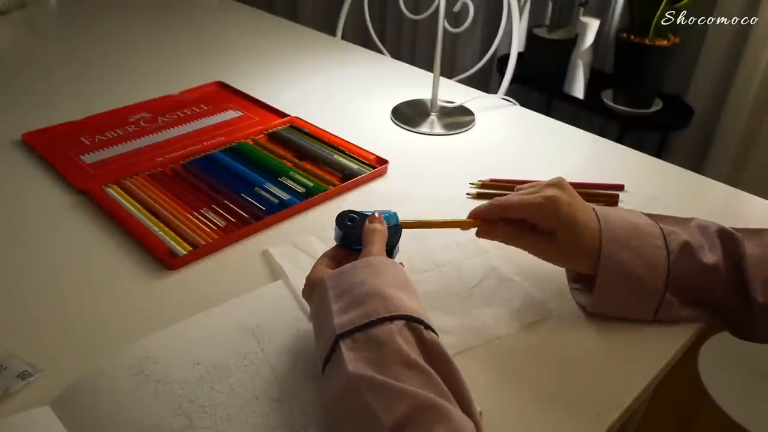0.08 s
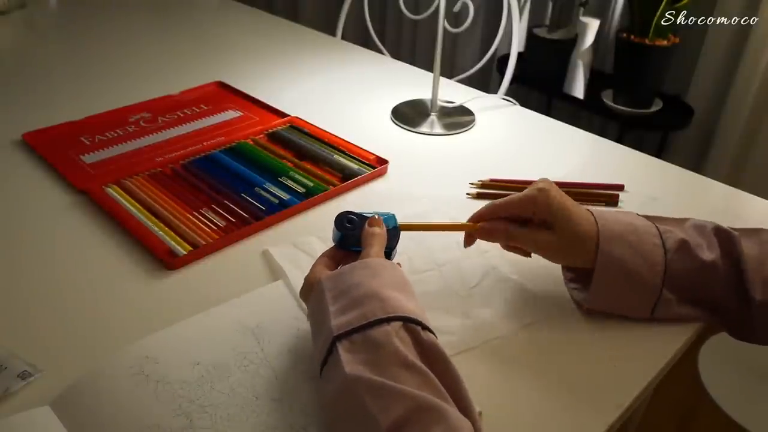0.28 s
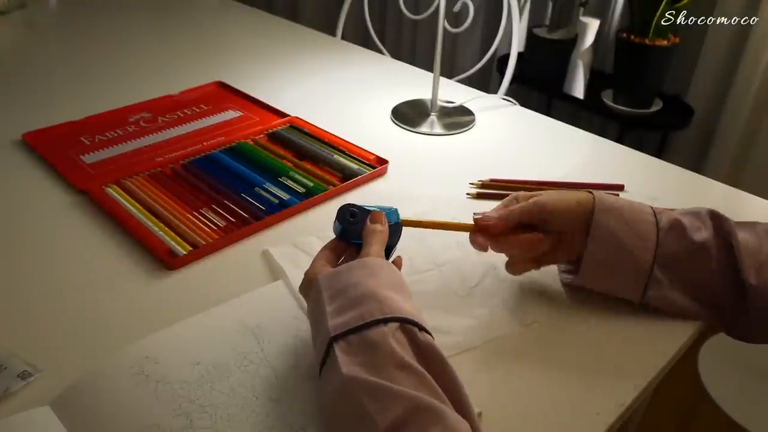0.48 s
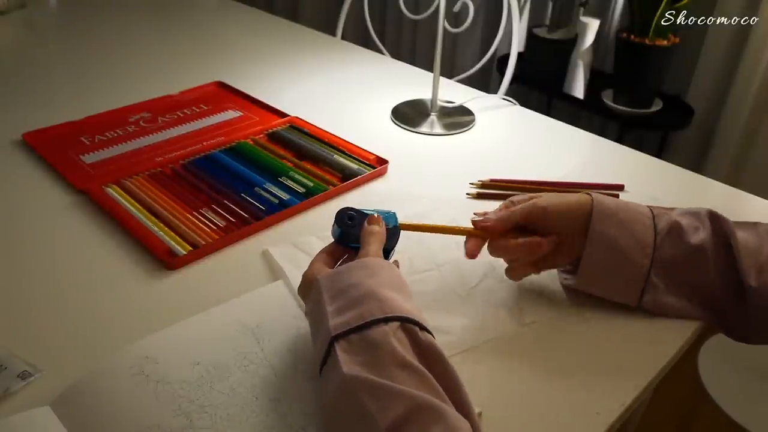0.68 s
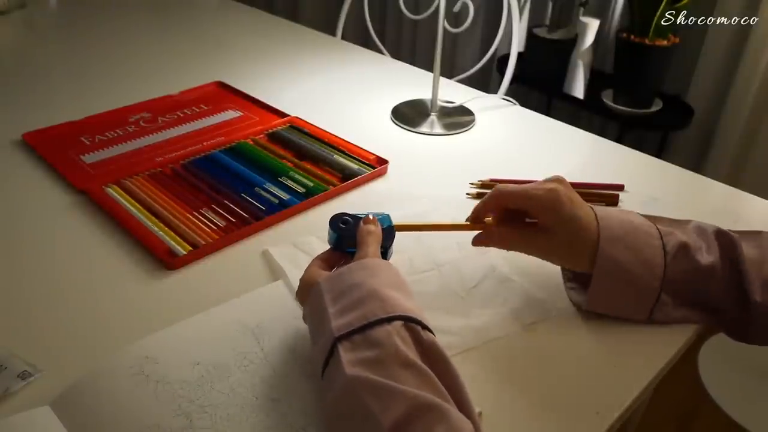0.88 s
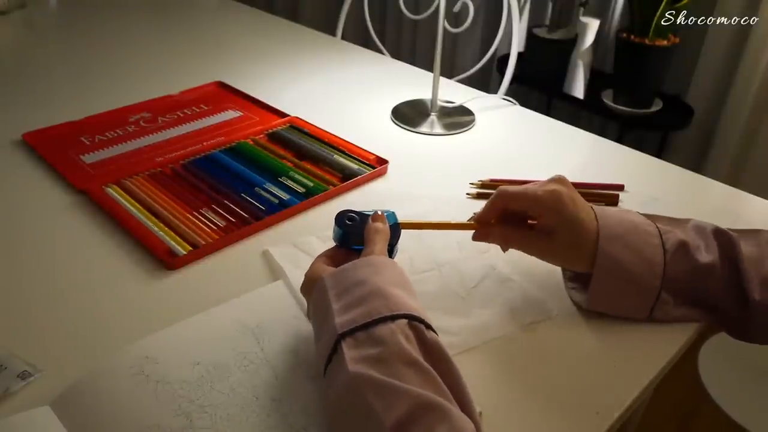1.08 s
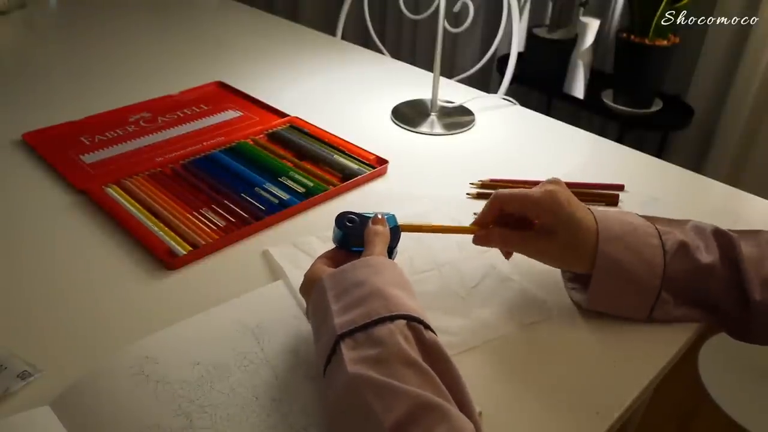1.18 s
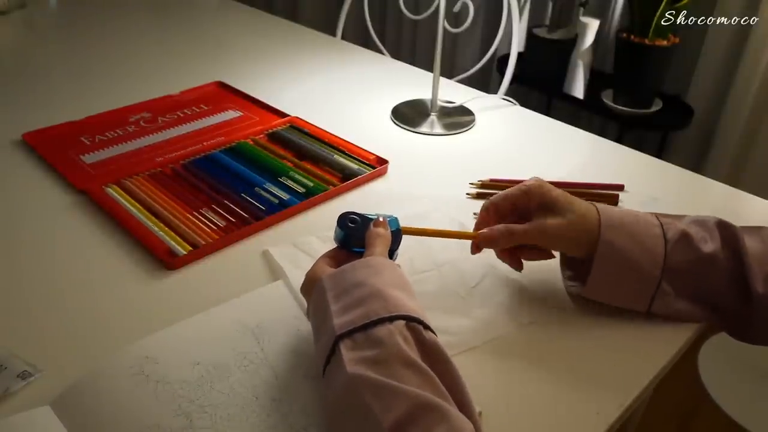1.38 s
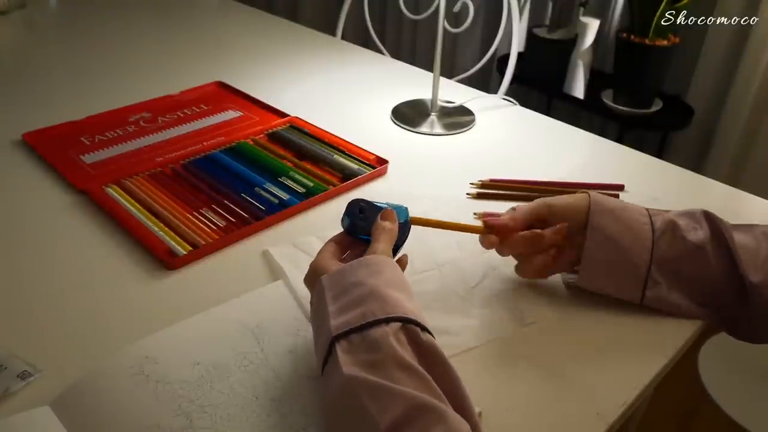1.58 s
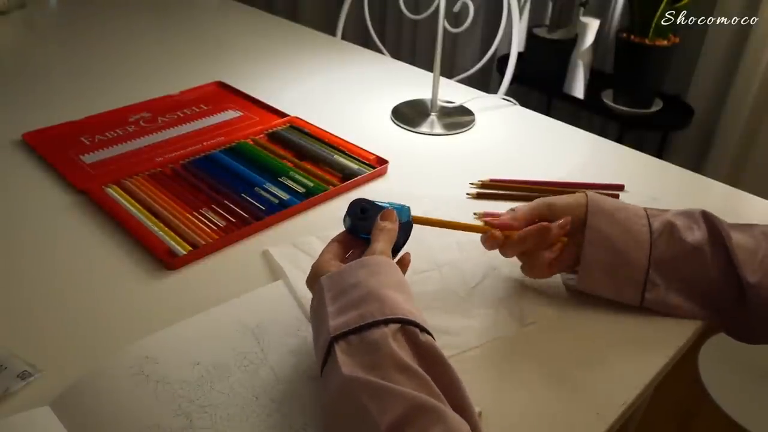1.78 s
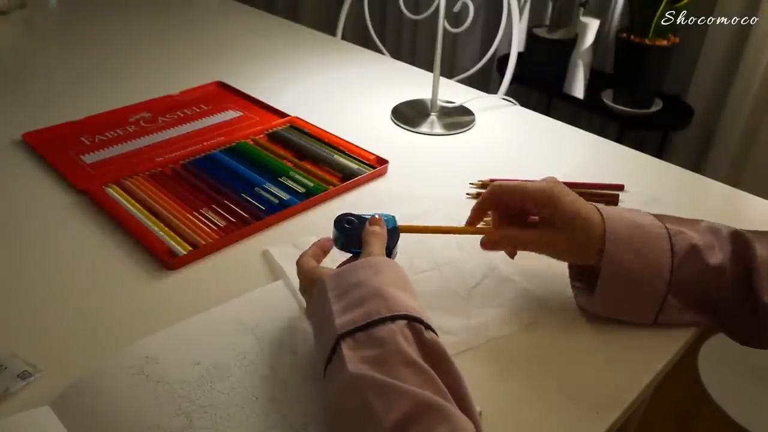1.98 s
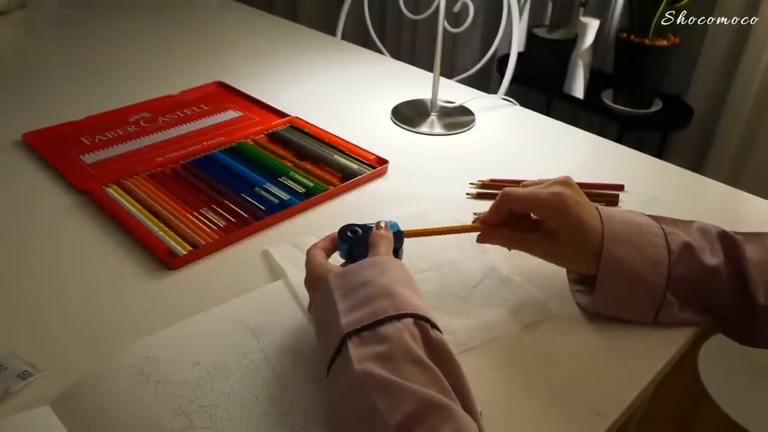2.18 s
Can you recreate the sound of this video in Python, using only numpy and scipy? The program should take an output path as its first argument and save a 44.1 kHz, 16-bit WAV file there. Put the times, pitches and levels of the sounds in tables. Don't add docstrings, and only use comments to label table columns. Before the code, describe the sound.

Close stereo pickup of pencil sharpening indoors: a sharp bite and gritty half-second scrape, a gap with dull low motor ticks, a second scrape that starts lightly and deepens, then a barely audible finger rub on plastic.

```python
import sys
import numpy as np
from scipy import signal
from scipy.fft import rfft, irfft, next_fast_len
from scipy.io import wavfile

SR = 44100
rng = np.random.default_rng(int(sys.argv[2]) if len(sys.argv) > 2 else 0)


def waveform_to_disk(signal):
    frames = np.transpose(np.atleast_2d(signal))
    scaled = np.clip(frames, -1, 1) * 32767
    samples = np.round(scaled).astype(np.int16)
    wavfile.write(sys.argv[1], SR, samples)


def undo_db(level):
    steps = np.asarray(level, float) / 20
    return 10 ** steps


N = 97020


def rms_one(x):
    return x / np.sqrt(np.mean(x ** 2) + 1e-20)


def at_hz(points, hz):
    point_hz, point_db = np.transpose(points)
    return np.interp(np.log(hz), np.log(point_hz), point_db, left=-60, right=-60)


def drift(rate):
    r = np.exp(-16 * np.pi * rate / SR)
    noise = rng.standard_normal(N // 8 + 4002)
    slow = signal.lfilter([1], [1, -2 * r, r * r], noise)[4000:]
    return np.interp(np.arange(N) / 8, np.arange(len(slow)), rms_one(slow))


def resonance(x, hz, width_hz):
    r = np.exp(-np.pi * width_hz / SR)
    ringing = [1, -2 * r * np.cos(2 * np.pi * hz / SR), r * r]
    return signal.lfilter(np.array([1, 0, -1]) * (1 - r * r) / 2, ringing, x)


def twice(x, hz, width_hz):
    wider_hz = 1.55 * width_hz
    return resonance(resonance(x, hz, wider_hz), hz, wider_hz)


def gliding(x, hz, width_hz):
    turn = np.exp(2j * np.pi * np.cumsum(hz) / SR)
    r = np.exp(-1.55 * np.pi * width_hz / SR)
    return 2 * np.real(turn * signal.lfilter([(1 - r) ** 2], [1, -2 * r, r * r], x / turn))


# (f/Hz, likeness/0-1)
LIKENESS = [(60, 0.99), (180, 0.96), (550, 0.98), (1650, 0.8), (4970, 0.5), (15000, 0.84)]


def banded_noise(spectrum, patchy_db, count):
    out = 0
    edges = 18 * 2 ** np.arange(0, 10, 1 / count)
    white = rng.standard_normal((2, 2, N + 8000))
    likeness_hz, likeness = np.transpose(LIKENESS)
    for k, (low, high) in enumerate(zip(edges, edges[1:])):
        hz = np.sqrt(low * high)
        if spectrum[0][0] <= hz <= spectrum[-1][0]:
            band = signal.butter(2, [low, high], "band", fs=SR, output="sos")
            mid, side = signal.sosfilt(band, white[k % 2])[:, 8000:]
            alike = np.clip(np.interp(np.log(hz), np.log(likeness_hz), likeness), 0, 1)
            gain = undo_db(at_hz(spectrum, hz) + patchy_db * drift(6.9))
            out = out + gain * (np.sqrt(1 + alike) * mid + np.sqrt(1 - alike) * side * [[1], [-1]])
    return rms_one(out)


# (f/Hz, level/dB per Hz)
RUMBLE = [(12, -33), (20, 1.5), (53, 2.5), (113, -2), (409, -2.5), (526, -5.5), (742, -9.5), (1210, -7.5),
          (1500, -27.5), (1950, -15.5), (3300, -120)]
# (f/Hz, level/dB per Hz)
HISS = [(1400, -1), (2500, -11), (3600, 0.5), (5300, -10), (7000, -1), (10500, -6.5), (13500, -1.5),
        (17000, 0.5)]


def rumble_and_hiss():
    rumble = undo_db(-57) * banded_noise(RUMBLE, patchy_db=2.5, count=3)
    hiss = undo_db(-60.5) * banded_noise(HISS, patchy_db=1.5, count=6)
    return rumble + hiss


# (t/s, level/dB)
WHIR = [
    (0, 2),
    (.3, -9.5),
    (.75, 3),
    (1.25, 0),
    (1.8, 0.5),
    (2.2, -7.5),
]
# (f/Hz, width/Hz, level/dB rms)
CASING = [(44.5, 8.4, -67), (250, 65, -66), (406, 6.9, -64.5), (500.6, 13, -64.5), (642, 23, -73),
          (1203, 33, -76)]


def whir():
    white = rng.standard_normal(N + 8000)
    busy = undo_db(np.interp(np.arange(N) / SR, *np.transpose(WHIR)))
    return busy * sum(undo_db(db) * rms_one(resonance(white, hz, width_hz)[8000:]) for hz, width_hz, db in CASING)


# (t/s, pressure level/dB, depth of cut/0-1, shavings cup level/dB, blade f/Hz)
TWIST_ONE = [
    (.2255, -58, 0, -9, 7500),
    (0.232, -37.5, 0.06, -3, 7200),
    (.275, -47, 0.63, -3.5, 8000),
    (.43, -44, 0.9, 2, 6900),
    (.475, -40.5, 0.64, 4.5, 7850),
    (.53, -40, 0.78, 0, 6800),
    (0.584, -36, 0.92, -3, 7800),
    (.62, -42, 0.76, -4.5, 7460),
    (.76, -69, 0, 7.5, 7300),
]
TWIST_TWO = [
    (1.2, -72, 0.05, -2, 7900),
    (1.235, -57.5, .05, 0.5, 7800),
    (1.33, -55.5, 0.27, -1, 7840),
    (1.42, -47, 0.28, -1, 8040),
    (1.545, -43.5, 0.7, -7, 7500),
    (1.56, -43, 0.99, -11, 7900),
    (1.66, -42, 1, 2.5, 8000),
    (1.746, -42.5, 1, 10.5, 8160),
    (1.88, -68.5, 1, -10, 8260),
]


def grip(s):
    times, *columns = np.transpose(TWIST_ONE + TWIST_TWO)
    pressure_db, depth, cup_db, blade_hz = [np.interp(s, times, column) for column in columns]
    return pressure_db, np.clip(depth, 0, 1), cup_db, blade_hz


# (f/Hz, width/Hz, first twist light level/dB, deep level/dB, second twist light level/dB, deep level/dB)
HOUSING = [(930, 630, -10, -15, -12.5, -11), (1743, 132, -13, -1.5, -5.5, -6.5),
           (1980, 190, -20, -6.5, 0.5, -4.5), (2550, 970, -27, -10.5, -1, -21.5),
           (3490, 545, -1.5, -8, -11, -10), (4280, 430, -2.5, 0, -4, -5), (4930, 850, -4, -7.5, -8, -1),
           (5970, 1700, -7.5, -7.5, -11, -3.5), (6790, 810, -1, -3, -6.5, -1.5),
           (8280, 880, -4, -2.5, -28, 1), (9370, 1060, -10, -5, -8.5, -3), (11100, 1430, 0.5, -3.5, -3, 0),
           (13050, 1100, -1, -2.5, -1, -1.5), (14240, 2400, -2, -9, -12, -3)]


def housing_db(mode, s):
    hz, _, light_one, deep_one, light_two, deep_two = mode
    _, depth, cup_db, _ = grip(s)
    second = s > TWIST_TWO[0][0]
    light_db = np.where(second, light_two, light_one)
    deep_db = np.where(second, deep_two, deep_one)
    return light_db + depth * (deep_db - light_db) + cup_db * (3000 < hz < 4500)


# (t/s, peak level/dB, favoured
# f/Hz, breadth level/dB)
SNAPS = [(0.2118, -41, 7100, 0), (0.226, -13.5, 7600, -4), (0.2273, -24, 10800, -10),
         (0.2336, -28, 11890, -2), (0.2375, -21, 13610, 1), (0.249, -20.5, 7800, 8),
         (0.2822, -37, 7540, -2.5), (0.3006, -24, 7450, -8), (0.3217, -33, 7710, -8),
         (0.3262, -27, 7540, -3), (0.3406, -28, 7200, -1), (0.3556, -26.5, 7200, -2),
         (0.3575, -36, 11700, -21), (0.3639, -33, 7200, -10), (0.371, -36, 6840, 5), (0.3806, -32, 7410, 3),
         (0.3859, -27.5, 7300, -5), (0.3941, -28, 7450, -3), (0.4032, -30, 13000, 2),
         (0.4057, -29, 6870, -3), (0.423, -32, 6700, 0), (0.4303, -29.5, 6700, -2), (0.446, -30, 6980, -2),
         (0.4532, -33, 4200, -1), (0.4687, -27, 8130, -3), (0.4764, -27, 8100, -1), (0.479, -26, 8050, 3),
         (0.4945, -25, 7100, 3), (0.5044, -33, 4560, 4), (0.5106, -29, 4120, -10), (0.5171, -29, 4420, -4),
         (0.5314, -29, 7040, -1), (0.5405, -34, 8400, -4), (0.5426, -28, 7500, -8), (0.547, -24, 7240, -4),
         (0.5617, -23, 7860, -4), (0.565, -22, 7840, 2), (0.5762, -17.5, 7060, 4), (0.582, -27, 7240, 5),
         (0.5869, -34, 14250, 0), (0.6151, -48, 10600, 6), (0.632, -31, 8200, 3), (0.6453, -36, 8100, -1),
         (0.6886, -42, 3830, -2),
         (1.2373, -39, 7500, -6), (1.2512, -51, 7750, -9), (1.262, -42, 7920, -12),
               (1.271, -50, 8050, -7), (1.3042, -33.5, 7500, -3), (1.337, -37, 8740, 3),
               (1.3568, -39, 7300, -9), (1.4162, -42, 7880, 3), (1.432, -33.5, 12100, 2),
               (1.4484, -39, 11670, 3), (1.479, -33, 5300, -2), (1.4971, -30, 13100, 6),
               (1.5083, -31, 5250, -4), (1.5287, -28, 5350, -4), (1.5322, -28.5, 5270, -14),
               (1.5547, -19, 5430, -1), (1.5618, -25, 7500, -9), (1.5652, -20, 13400, 3.5),
               (1.574, -29, 6850, 0), (1.5762, -24, 6600, 4), (1.5946, -29, 11300, -1),
               (1.6047, -27, 11800, 2), (1.6143, -32, 5330, 0), (1.6178, -35, 11100, 2),
               (1.6298, -30, 13310, 1), (1.6339, -28, 12700, 5), (1.65, -29, 8550, 10),
               (1.6615, -43, 8350, -3), (1.6654, -32, 11400, 2), (1.6844, -39, 8050, 3),
               (1.695, -24.5, 7840, 7), (1.6994, -30, 10700, 3), (1.7068, -26.5, 11580, 0),
               (1.7198, -32, 11540, -13), (1.7247, -26.5, 7100, 1), (1.729, -24, 6100, 1),
               (1.7387, -40, 6160, -1), (1.7439, -39, 8600, -2), (1.7549, -28.5, 4670, 11),
               (1.7663, -32, 13350, -1), (1.7767, -29.5, 5760, 2), (1.7946, -45, 13300, -1),
               (1.8213, -41, 8530, -7), (2.117, -44, 7200, -1),
         (.2264, -24, 4600, -4),
]


def snaps():
    rise_s, t60_s, width_hz = 0.0007, 0.0065, 600
    out, t = np.zeros(N + 2048), np.arange(2048) / SR
    rows = SNAPS
    for (s, db, hz, broad_db), white in zip(rows, rng.standard_normal((len(rows), 2, 2048))):
        hard = 3 + (db > -21)
        burst = white * np.minimum(t / rise_s * hard ** 2, 1) * undo_db(-60 * t / t60_s)
        body = 0
        for k, mode in enumerate(HOUSING[1:]):
            body = body + undo_db(housing_db(mode, s)) * twice(burst[k % 2], mode[0], mode[1])
        snap = rms_one(twice(burst[0], hz, width_hz)) + undo_db(broad_db) * rms_one(body)
        out[int(s * SR):][:2048] += undo_db(db - 1) * snap / np.abs(snap).max()
    return out[:N]


def shaving():
    fibres_per_s, spread_db = 5500, 3.1
    t = np.arange(N) / SR
    pressure_db, depth, _, blade_hz = grip(t)
    first = (t > TWIST_ONE[0][0]) & (t < TWIST_ONE[-1][0])
    second = (t > TWIST_TWO[0][0]) & (t < TWIST_TWO[-1][0])
    sizes = undo_db(spread_db * np.minimum(rng.exponential(1, (3, N)), 5)) * rng.choice([-1, 1], (3, N))
    clicks = sizes * (rng.random((3, N)) < fibres_per_s / SR)
    chatter = undo_db(1.0 * drift(300))
    fibres = rms_one(clicks * chatter) * undo_db(pressure_db + 6.5) * (first | second)
    blade_db = 4 + depth * (-2.5 - 4)
    out = undo_db(blade_db) * gliding(fibres[2], blade_hz, 960)
    for k, mode in enumerate(HOUSING):
        wander_db = 1.5 * drift(25)
        out += undo_db(housing_db(mode, t) + wander_db) * twice(fibres[k % 2], mode[0], mode[1])
    return out


# (t/s, peak level/dB, f/Hz)
TICKS = [(0.51, -35.5, 400), (0.511, -32, 550), (0.768, -38.5, 524), (0.819, -45, 430), (0.902, -37, 555),
         (0.937, -38, 428), (1.001, -42.5, 520), (1.035, -36.5, 490), (1.1, -34, 520), (1.153, -55, 520),
         (1.185, -41, 540), (1.269, -34, 490), (1.304, -40.5, 427), (1.805, -37.5, 406),
         (1.835, -40.5, 410), (1.87, -37, 537), (2.01, -40.5, 450)]


def ticks():
    upper_hz, upper_db, rise_s, t60_s = 1126, -14, 0.00068, 0.025
    out, t = np.zeros(N + 4096), np.arange(4096) / SR
    fall = (1 - np.exp(-t / rise_s)) * undo_db(-60 * t / t60_s)
    for s, db, hz in TICKS:
        tick = np.sin(2 * np.pi * hz * t) + undo_db(upper_db) * np.sin(2 * np.pi * upper_hz * t)
        out[int(s * SR):][:4096] += undo_db(db - 6.5) * tick * fall / fall.max()
    return out[:N]


def fingers():
    start_s, level_db, hz, width_hz = 1.8, -70.5, 5260, 2000
    rub = rms_one(twice(rng.standard_normal(N), hz, width_hz))
    return undo_db(level_db) * rub * np.clip(10 * (np.arange(N) / SR - start_s), 0, 1)


def room(x):
    t60_s, wall_cut_hz, share = 0.22, 29000, 0.53
    size = next_fast_len(N + SR)
    hz = np.arange(size // 2 + 1) * SR / size
    dull = 1 / (1 + 1j * hz / wall_cut_hz)
    tails = np.zeros((2, len(hz)), complex)
    for k, lag in enumerate(rng.uniform(0.006, 0.03, 16)):
        loop = undo_db(-60 * lag / t60_s) * dull ** (lag / 0.018) * np.exp(-2j * np.pi * hz * lag)
        tails[k % 2] += loop / (1 - loop) * (-1) ** (k // 2)
    thin = (hz / (hz + 120)) ** 2
    mid, side = irfft(tails * thin * rfft(x, size), size)[:, :N] / np.sqrt(8)
    return np.sqrt(1 + share) * mid + np.sqrt(1 - share) * side * [[1], [-1]]


def scene():
    floor = rumble_and_hiss()
    close = whir() + snaps() + shaving() + ticks() + fingers()
    return close + undo_db(-7.5) * room(close) + floor


def band_limit(x):
    return signal.sosfilt(signal.butter(12, 16830, fs=SR, output="sos"), x)


def record(dry):
    top_cut = signal.cheby2(24, 60, 15950, fs=SR, output="sos")
    mix = signal.sosfilt(top_cut, dry)
    return band_limit(mix)


dry = scene()
out = record(dry)
waveform_to_disk(out)
```